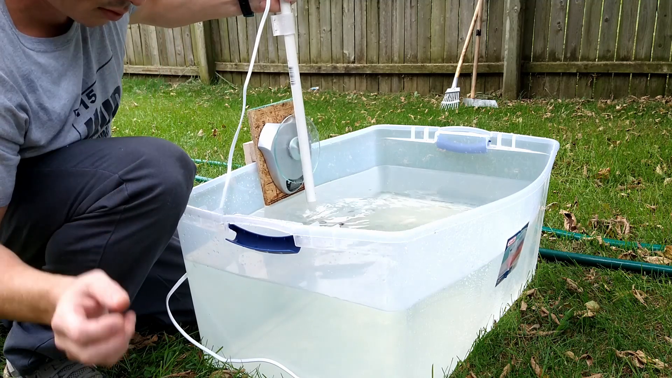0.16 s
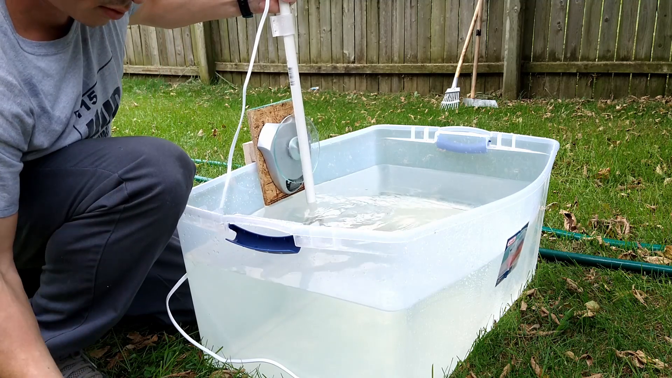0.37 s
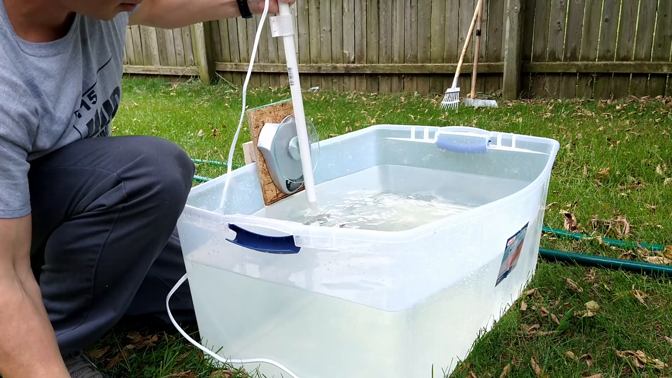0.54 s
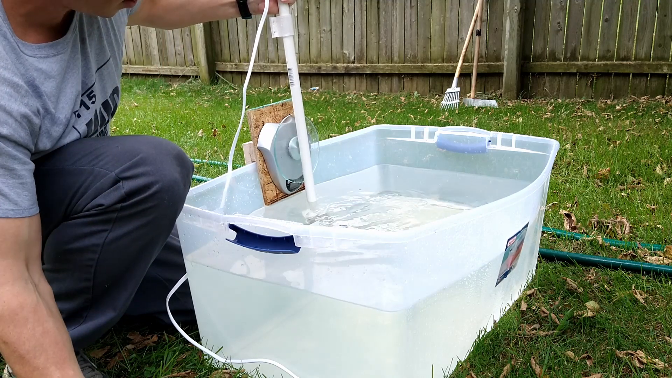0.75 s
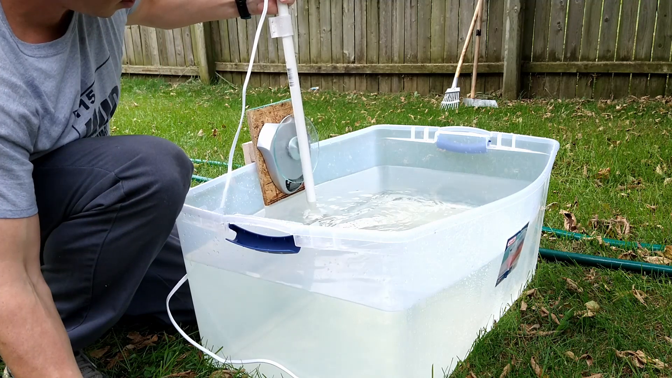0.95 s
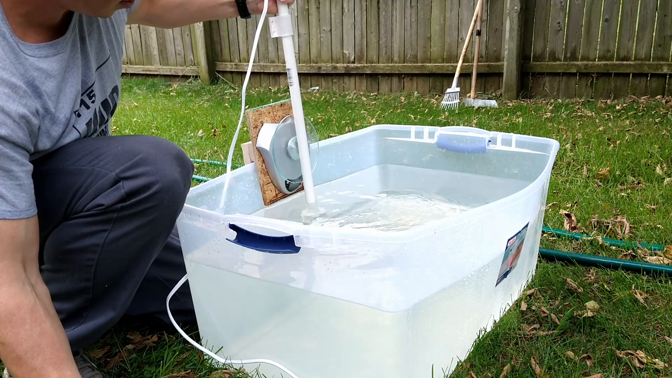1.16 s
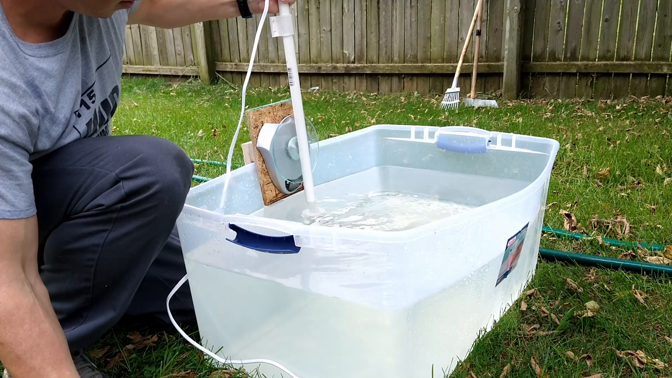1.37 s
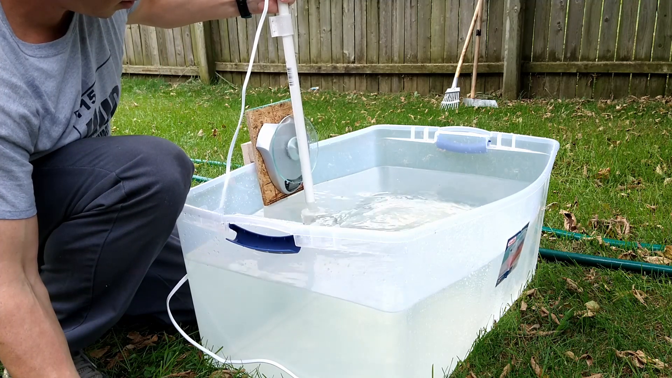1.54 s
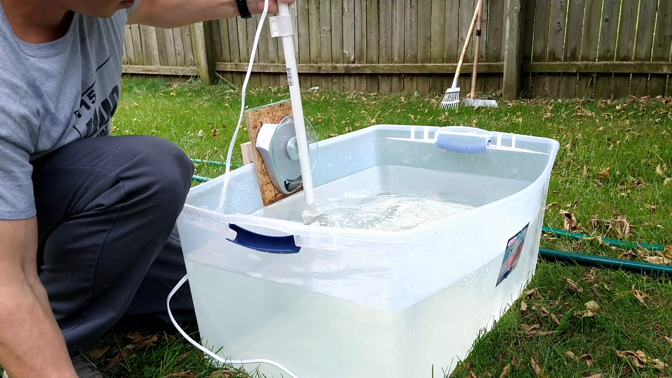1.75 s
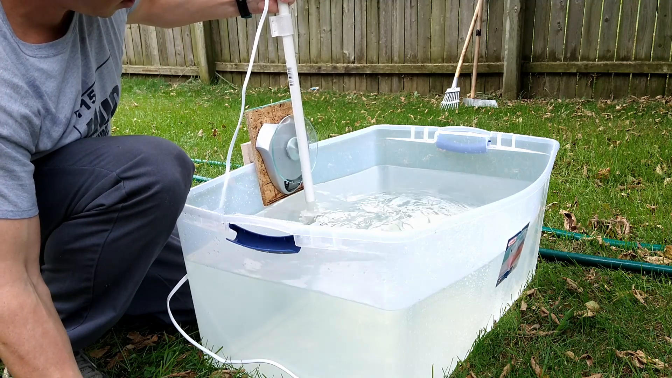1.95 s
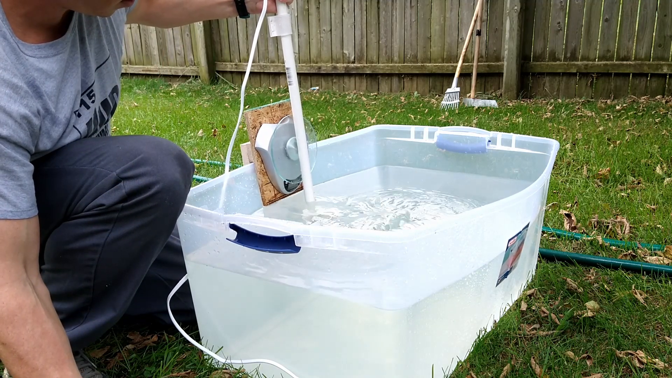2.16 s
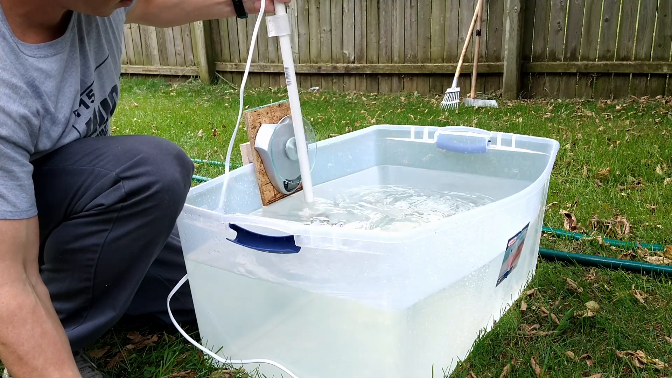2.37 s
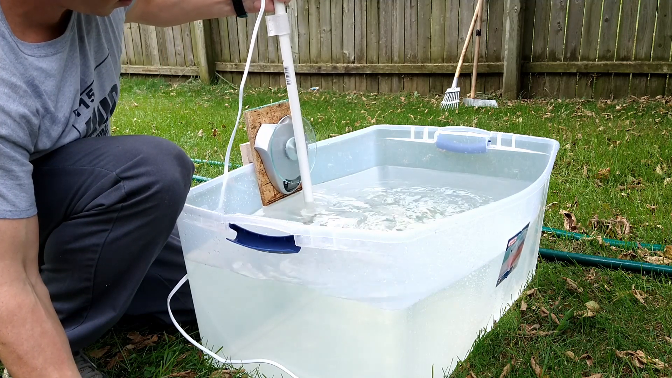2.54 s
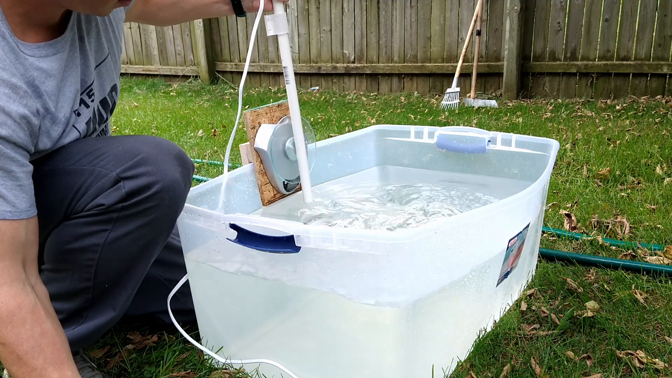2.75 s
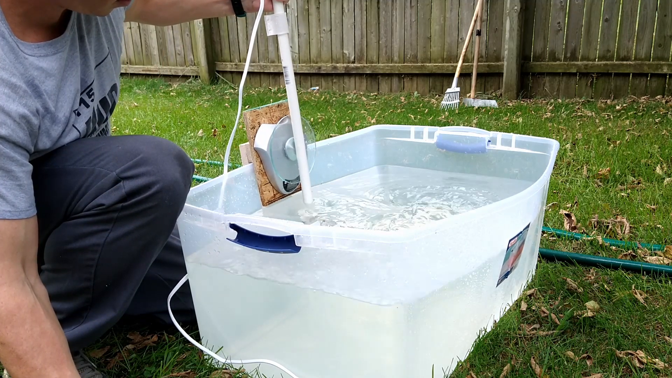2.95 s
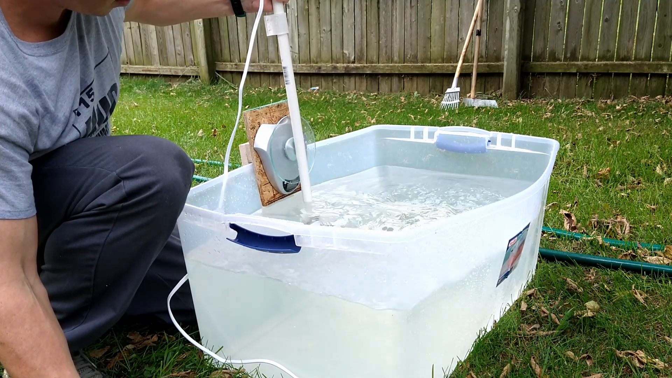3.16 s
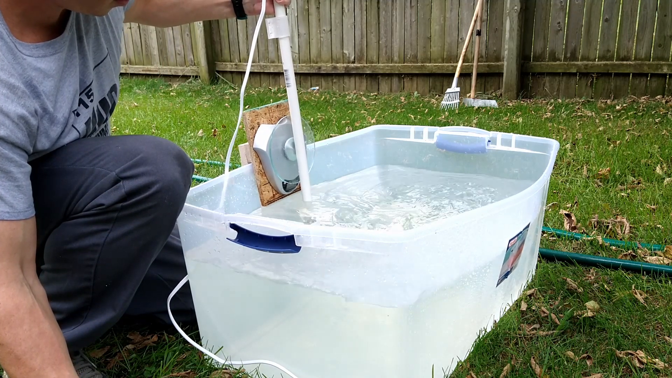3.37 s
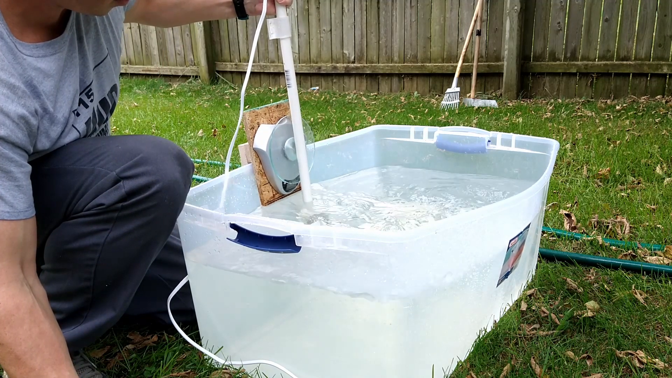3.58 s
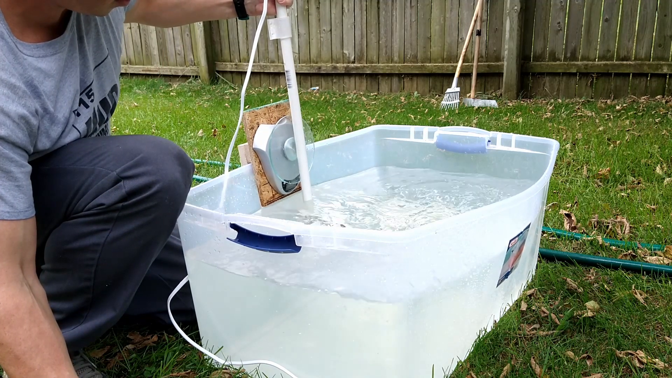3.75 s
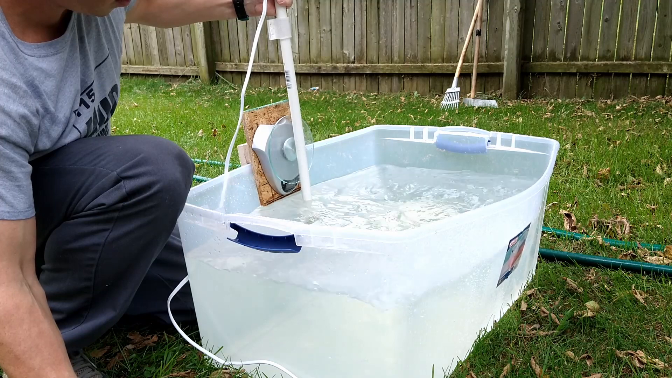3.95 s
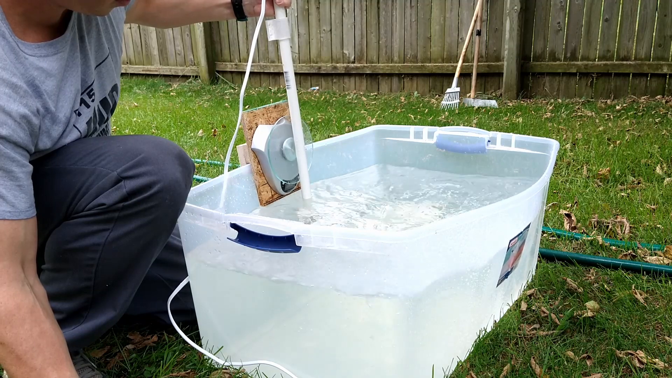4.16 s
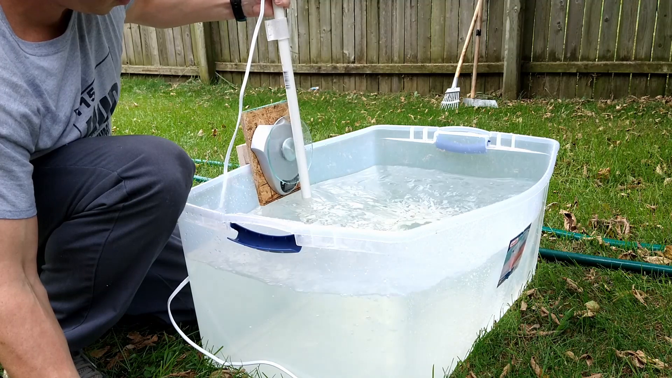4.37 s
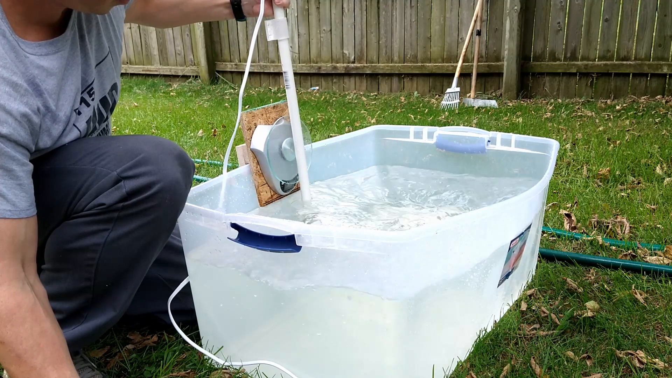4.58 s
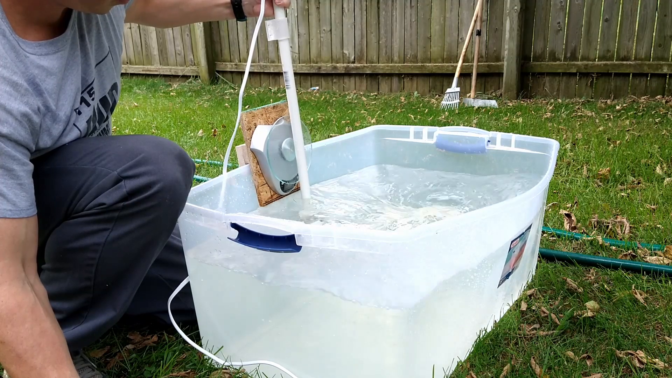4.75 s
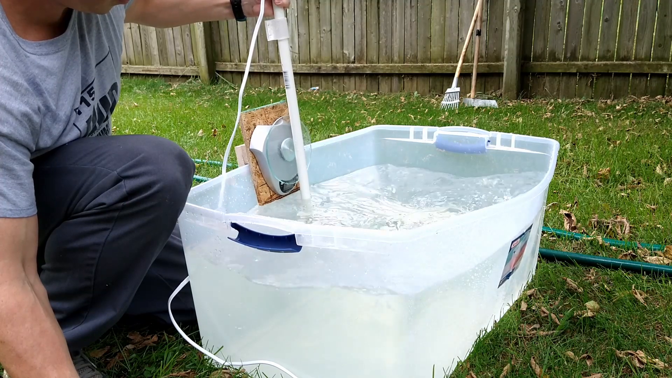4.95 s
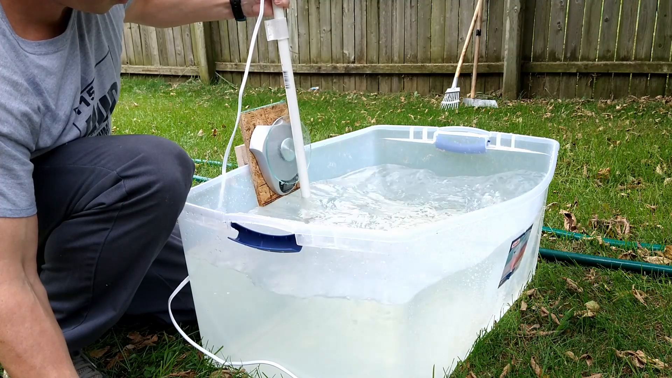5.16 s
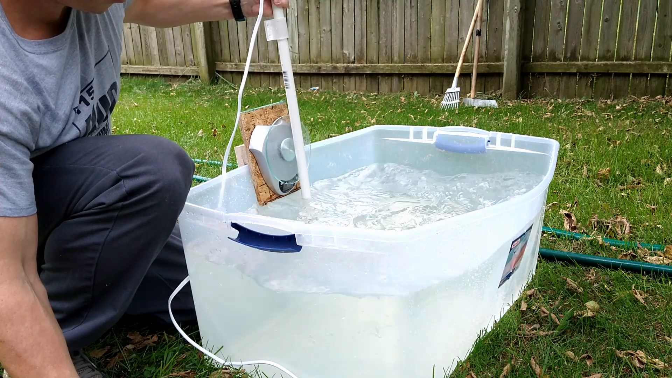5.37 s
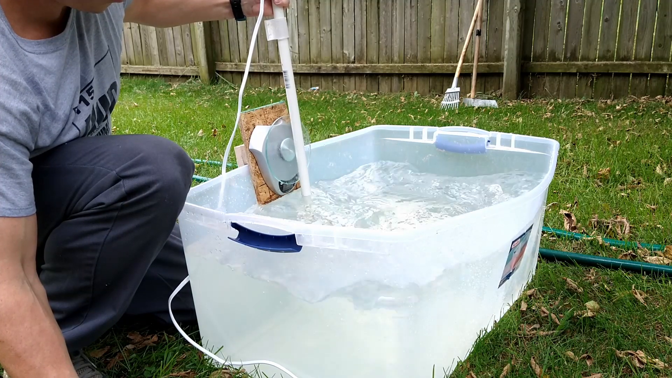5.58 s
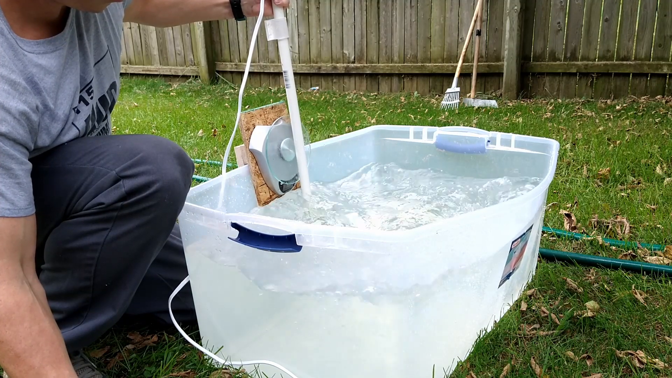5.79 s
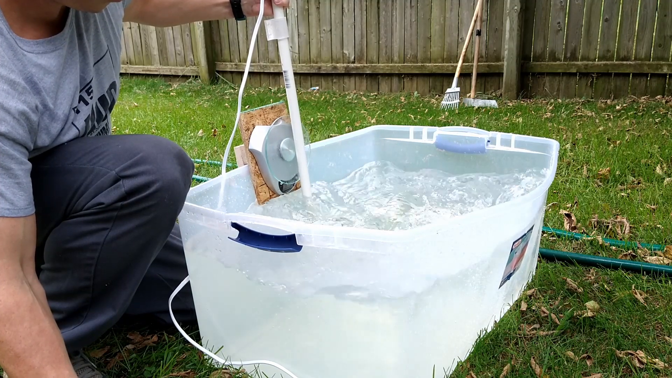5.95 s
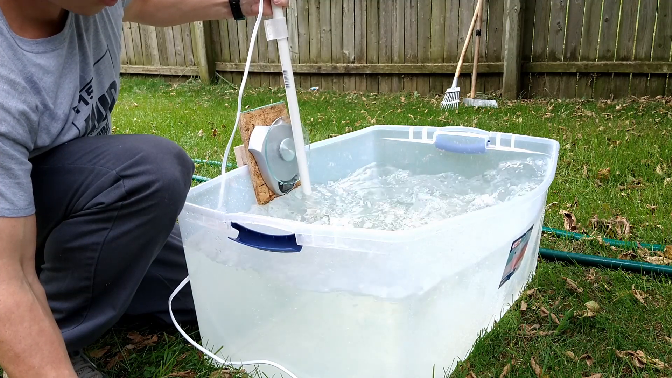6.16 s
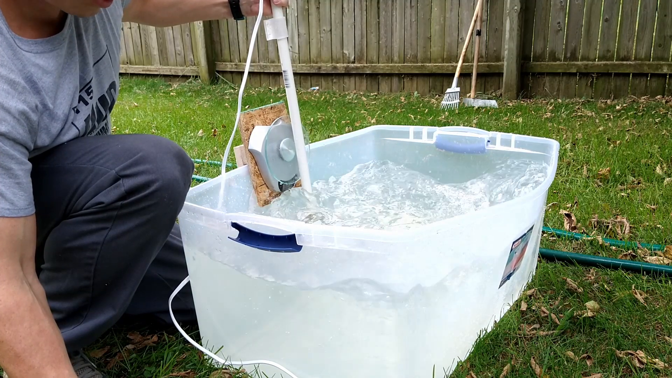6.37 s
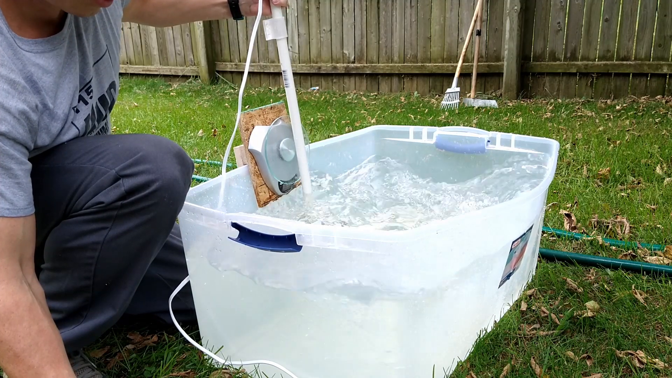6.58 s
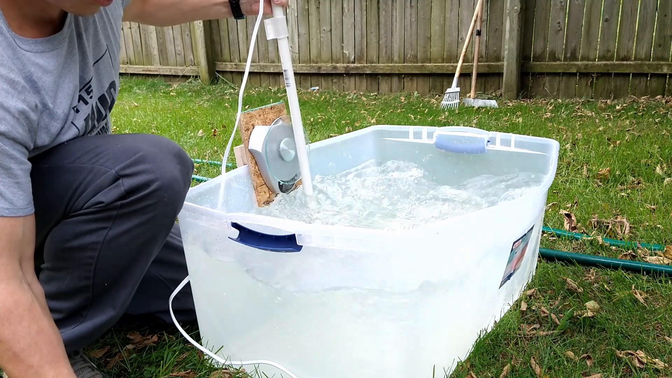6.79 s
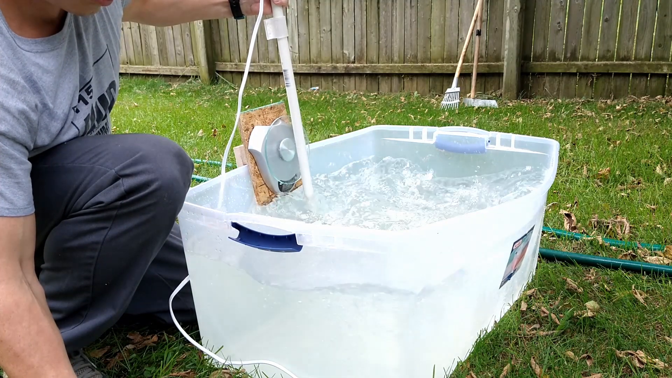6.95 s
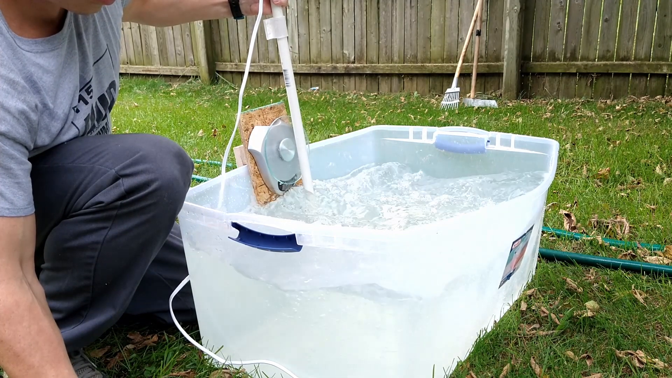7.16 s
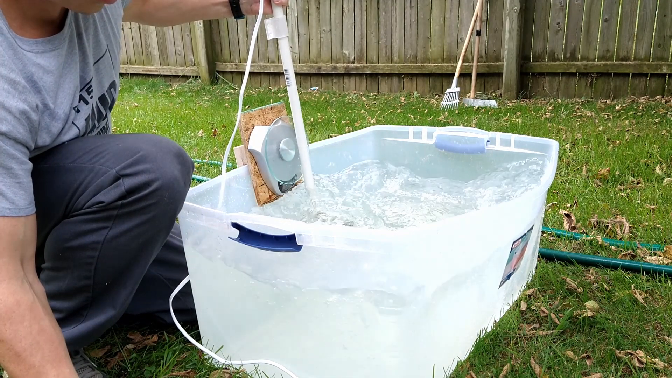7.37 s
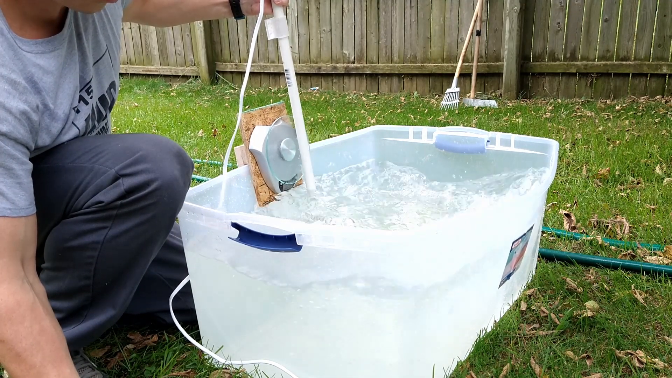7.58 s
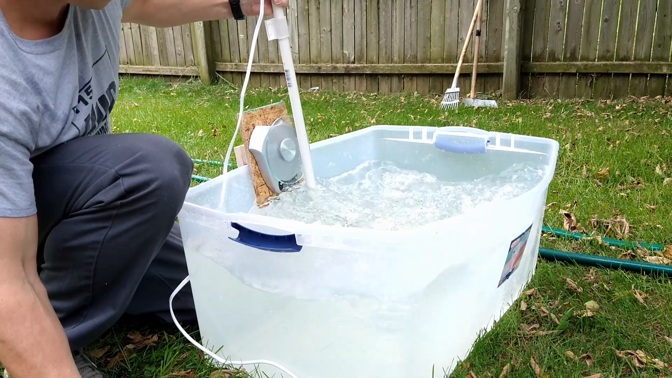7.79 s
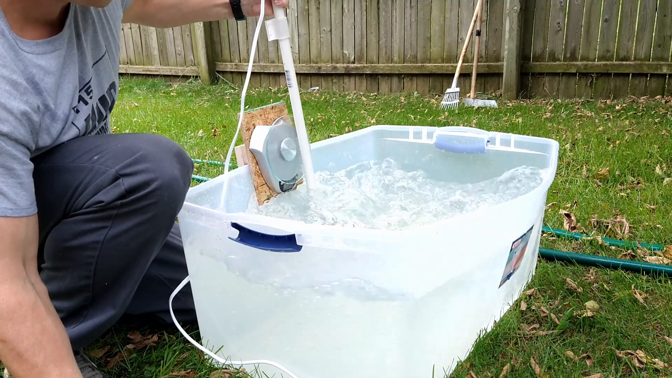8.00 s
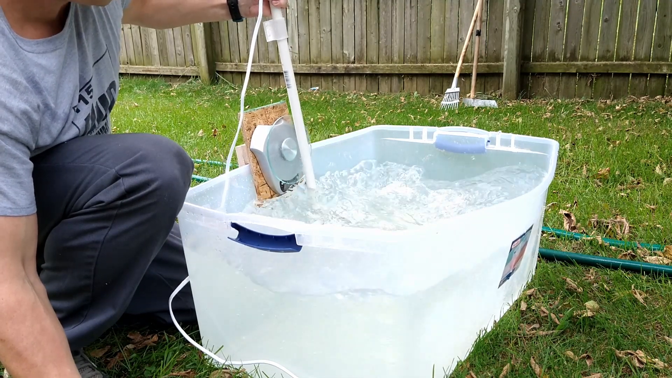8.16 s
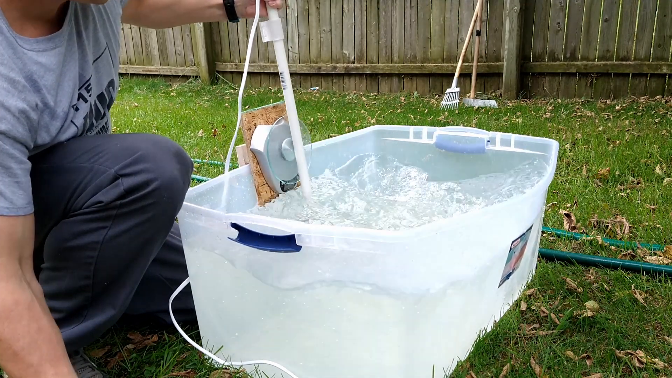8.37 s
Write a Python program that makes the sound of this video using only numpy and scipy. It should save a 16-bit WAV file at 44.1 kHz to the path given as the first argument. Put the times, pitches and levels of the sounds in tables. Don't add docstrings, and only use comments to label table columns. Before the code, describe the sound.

A small electric motor whines up in rising steps outdoors, its propeller churning a plastic tub of water into frothy, bubbling splashes, then easing down.

```python
import sys
import numpy as np
from scipy import signal
from scipy.fft import rfft, irfft, next_fast_len
from scipy.io import wavfile
from scipy.ndimage import uniform_filter1d, map_coordinates

SR = 44100
rng = np.random.default_rng(int(sys.argv[2]) if len(sys.argv) > 2 else 0)


def dump(signal):
    limited = np.clip(np.atleast_2d(signal).T, -1, 1)
    pcm = np.round(limited * 32767).astype(np.int16)
    wavfile.write(sys.argv[1], SR, pcm)


def voltage_ratio(level):
    return 10 ** (np.asarray(level, float) / 20)


N = 371674


def unit(x):
    return x / np.sqrt(np.mean(np.abs(x) ** 2) + 1e-20)


def along(points, hz):
    f, value = np.transpose(points)
    return np.interp(np.log(hz + 1), np.log(f + 1), value)


def curves(rows):
    s, *columns = np.transpose(rows)
    return [uniform_filter1d(np.interp(np.arange(N) / SR, s, c), size=2001) for c in columns]


def bumps(rows):
    t = np.arange(N) / SR
    return sum(height * np.exp(-((t - s) / half) ** 2) for s, height, half in rows)


def wobble(rate):
    coarse = np.arange(0, N + 32, 32)
    knots = rng.standard_normal(int(N * rate / SR) + 5)
    return np.interp(np.arange(N), coarse, map_coordinates(knots, [coarse * rate / SR]))


def blur(width):
    return wobble(width) + 1j * wobble(width)


def filtered(x, response):
    m = next_fast_len(N + 8192)
    return irfft(rfft(x, m) * response(np.fft.rfftfreq(m, 1 / SR)), m)[..., :N]


def modes(table, f):
    return np.sqrt(sum(voltage_ratio(db) ** 2 / (1 + (2 * (f - hz) / width) ** 2) ** 1.35 for hz, width, db in table))


def late(x, s):
    return np.pad(x, (round(s * SR), 0))[:N]


def patchy(depth_db):
    z = signal.stft(rng.standard_normal((2, N)), nperseg=512)[2]
    field = uniform_filter1d(rng.standard_normal(z.shape[1:]), size=6, axis=0)
    field = uniform_filter1d(field, size=10, axis=1)
    return signal.istft(z * voltage_ratio(depth_db * unit(field)), nperseg=512)[1][:, :N]


# frequency in Hz, left-right likeness from 0 to 1.
TUB_ALIKE = [(100, 0.66), (700, 0.87), (1500, 0.52), (2800, 0.88), (5000, 0.62), (8000, 0.82),
             (12000, 0.61)]


def spread(pair, alike=TUB_ALIKE):
    def shares(hz):
        turn = np.arccos(np.clip(along(alike, hz), -1, 1)) / 2
        return np.array([np.cos(turn), np.sin(turn)])
    mid, side = filtered(pair, shares)
    return np.array([mid + side, mid - side])


FULL_HZ = 3186


def law(hz, full_db, slope_db, knee_hz, steep_db, least_db):
    below = np.minimum(np.log2(hz / knee_hz), 0)
    above = np.log2(hz / FULL_HZ) - below
    return np.maximum(full_db + slope_db * above + steep_db * below, least_db)


# time in seconds, gear teeth meeting per second in Hz.
KNOB = [(1.0, 880), (1.6, 1325), (1.83, 1585), (2.22, 1607), (3.4, 2098), (3.74, 2120), (4.04, 2385),
        (4.32, 2405), (4.6, 2515), (4.78, 2655), (5.36, 2990), (5.9, 3184), (6.8, 3181), (7.12, 3196),
        (7.52, 3048), (7.74, 2880), (8.2, 2318), (8.43, 2312)]


def tooth_phase():
    inertia_s = .12
    hz = uniform_filter1d(curves(KNOB)[0], size=round(inertia_s * SR))
    return hz, 2 * np.pi * np.cumsum(hz + .8 * wobble(25)) / SR


# tooth rate in Hz, left level in dB, right level in dB, left lead in radians.
RADIATES = [(980, -79, -80, .8), (1590, -60.5, -61, 1.3), (1850, -62, -61, 2.1), (2130, -41, -49.5, 1.1),
            (2648, -32.5, -33, 1.9), (2800, -24.5, -25.5, 1.095), (3012, -22, -23.5, 1.6),
            (3190, -24, -28, 2.11)]
# time in seconds, left change in dB, right change in dB, extra left
SWAY = [(1.8, -2.2, -1.4, -0.2), (3.1, 0.1, -0.5, -0.4), (3.45, -1.5, -0.9, 0.2), (3.75, -3.5, -2.9, -0.8),
        (4.1, -4.1, -0.3, -0.3), (4.5, -1.9, -2.2, -0.2), (4.95, -0.6, -3.1, -0.4), (5.4, -0.1, 1.3, 0.2),
        (5.82, -2.8, 0.6, -0.1), (5.88, -3.1, -1.5, 0.7), (6.15, -2.3, 0.0, 0.5), (6.37, 0.8, -0.2, -0.3),
        (6.95, -1.5, 0.9, 0.6), (7.08, 0.6, 0.4, -0.3), (7.4, -1.5, -1.3, -0.0), (7.85, -1.2, -0.3, 0.3),
        (8.0, -2.5, -1.9, -0.3), (8.4, 2.0, -0.6, -0.4)]
# tooth rate in Hz, width in Hz, right change in dB, extra left
RIM_SHADE = (2063, 94, -5, 0.5)
# time in seconds, left change in dB, right change in dB,
# extra left lead in radians.
REFLECTIONS = [(1.497, -22.0, -18.0, 0.0), (3.223, -8.0, -12.0, -0.0), (3.427, -7.0, -9.0, 0.0),
               (3.602, 3.0, -19.0, 0.0), (3.657, 3.0, -17.0, 0.0), (3.741, -4.0, 8.0, -1.5),
               (3.861, -6.0, 7.0, 0.5), (3.966, 4.0, -2.0, 0.3), (4.061, 5.0, 1.0, -0.5),
               (4.121, -2.0, -6.0, -0.2), (4.42, 2.0, -5.0, -1.1), (4.455, -4.0, 3.0, -2.1),
               (4.485, -4.0, 7.0, 1.5), (4.515, 4.0, -5.0, 0.8), (4.545, -5.0, 1.0, -1.2),
               (4.629, 5.0, -5.0, 0.6), (4.664, 1.0, -4.0, -0.6), (4.739, 2.0, -2.0, -1.7),
               (4.769, -3.0, 2.0, -1.0), (4.834, 0.0, -4.0, -1.6), (4.864, -8.0, 5.0, 0.2),
               (4.894, -1.0, -6.0, 0.8), (4.954, -3.0, -2.0, 0.9), (5.039, 1.0, 1.0, 0.7),
               (5.183, 1.0, 3.0, -0.0), (5.363, -5.0, -5.0, -0.5), (5.507, 0.0, -4.0, -0.8),
               (5.662, -15.0, 0.0, 0.2), (5.697, 0.0, 3.0, 0.8), (5.827, 2.0, 1.0, -0.7),
               (5.857, -8.0, -1.0, -0.3), (6.136, -5.0, 1.0, -0.1), (7.054, 3.0, 3.0, -0.1),
               (7.179, 1.0, 1.0, 0.9), (7.209, -11.0, -3.0, 0.5), (7.239, -4.0, -2.0, -1.2),
               (7.273, 1.0, -2.0, -1.0), (7.383, -5.0, 3.0, 0.6), (7.413, -7.0, 0.0, -1.2),
               (7.443, 3.0, -1.0, -0.5), (7.558, 0.0, -9.0, -0.4), (7.658, 3.0, 1.0, 0.5),
               (7.707, -1.0, 3.0, 0.5), (7.842, 2.0, -2.0, -0.5), (7.897, -7.0, -2.0, -0.5),
               (7.957, 0.0, -11.0, -0.3), (8.067, 1.0, -8.0, -0.1), (8.146, -6.0, 3.0, -0.3),
               (8.231, 0.0, 5.0, 0.2), (8.386, 0.0, -7.0, -0.3)]
# time in seconds, change in dB, half width in seconds.
DROPOUTS = [(1.57, -8, .025), (2.62, -8, .015), (2.664, -12, .02), (2.71, -5, .02), (3.41, -4, .025),
            (2.873, -9, .02), (3.04, -6, .02), (3.12, -10, .02), (3.3, -7, .04), (4.49, -8, .008),
            (4.65, -8, .008), (6.8, -2, .012), (7.195, -2, .008), (7.37, -3, .008), (7.63, -6, .006),
            (7.705, -5, .006), (7.885, -7, .006), (7.92, -7, .006), (8.045, -8, .006), (8.085, -10, .007),
            (8.11, -6, .006), (8.146, -6, .006)]
# time in seconds, change in dB, half width in seconds.
LEFT_ONLY = [
    (2.32, 6, .08),
    (2.8, 4, .05),
    (3.3, 4, .04),
    (3.52, 2.5, .08),
    (3.702, -9, .01),
    (4.005, -6, .012),
    (4.47, -9, .007),
    (4.94, -9, .008),
    (5.225, -4, .015),
    (5.46, 3, .04),
]
# time in seconds, extra left lead in radians, half width in seconds.
PHASE_SLIPS = [(5.87, .4, .015), (5.945, .6, .015), (6.05, .1, .03), (6.27, -.5, .04), (6.72, -.4, .04),
               (6.8, .4, .025), (6.935, .6, .015), (6.97, -.4, .02), (7.37, .55, .018), (7.2, .25, .012),
               (7.54, -1.2, .03)]


def whine(hz, phase):
    left_db, right_db, lead = (along([(row[0], row[k]) for row in RADIATES], hz) for k in range(1, 4))
    sway_left, sway_right, sway_lead = curves(SWAY)
    shade_hz, shade_width, shade_db, shade_lead = RIM_SHADE
    shade = np.exp(-((hz - shade_hz) / shade_width) ** 2)
    left_db = left_db + sway_left
    right_db = right_db + sway_right + shade_db * shade
    lead = lead + sway_lead + shade_lead * shade

    glide = np.clip(np.abs(np.gradient(hz)) * SR / 400, 0, 1)
    flutter = (.7 + .6 * glide) * np.array([wobble(45), wobble(45)])
    flutter = flutter + bumps(DROPOUTS)
    flutter[0] += bumps(LEFT_ONLY)
    left_echo, right_echo, slip = (bumps([(row[0], row[k], .018) for row in REFLECTIONS]) for k in range(1, 4))
    lead = lead + bumps(PHASE_SLIPS) + slip + (.12 + .1 * glide) * wobble(35)

    level_db = np.array([left_db + left_echo, right_db + right_echo]) + flutter
    start = np.clip((hz - 1040) / 50, 0, 1)
    return np.sqrt(2) * start * voltage_ratio(level_db) * np.sin(phase + np.array([lead, -lead]) / 2)


# frequency in Hz, width in Hz, level in dB idling, slow and fast.
HOUSING = [(2868, 310, -5, -1, 3), (3520, 200, -2, -10, -1), (4610, 110, -2, 4, -17),
           (4920, 150, -11, 1.5, -8), (5070, 210, -13, -15, -10), (5795, 250, -0.5, -1, -2.5),
           (6450, 380, -13, 4.5, 0.5), (6884, 300, 0.5, 11.5, -3), (7380, 160, -13, -15, -11),
           (7730, 169, -23, -18, -7), (8470, 1700, -47, -9, -13.5)]
# frequency in Hz, level in dB per Hz.
BRUSH = [(600, -117), (1500, -13), (2500, -29), (4000, -7.5), (5500, -8), (7200, -51), (8200, -26),
         (9200, -58)]
# frequency in Hz, level in dB per Hz.
SHEEN = [(4410, -10), (7500, 2.5), (8140, -3.5), (10100, 0), (11500, -4), (15100, -3), (16000, -5.5)]
# level at full speed in dB, dB per
# octave, knee in Hz, dB per octave below the knee, least level in dB.
HISS_LAW = (-35.5, 15, 1573, 28.5, -81)
SHEEN_LAW = (-42.5, 9, 1921, 30.5, -100)
ORDERS = [.0685, .9, 1.1, 1.385, 2.049, 2.071, 2.077, 2.77]
ORDERS_DB = [-25, -13, -8, -8, -11, -8, -7, -19]


def motor(hz, phase):
    hiss_db = law(hz, *HISS_LAW)
    top_db = law(hz, *SHEEN_LAW) - hiss_db
    grit = voltage_ratio(np.cos(0.14 * phase) + 0.21 * wobble(11) + 0.64 * wobble(60))
    scrape = grit * patchy(depth_db=0.88)

    def shell(k):
        table = [(m[0], m[1], m[k]) for m in HOUSING]
        return unit(filtered(scrape, lambda f: voltage_ratio(along(BRUSH, f)) + modes(table, f)))

    speed = hz / hz.max()
    fast = np.clip((speed - .5) / 0.5, 0, 1)
    idle = np.clip((.5 - speed) / .08, 0, 1)
    hiss = idle * shell(k=2) + (1 - idle - fast) * shell(k=3) + fast * shell(k=4)
    hiss = hiss + voltage_ratio(top_db) * unit(filtered(scrape, lambda f: voltage_ratio(along(SHEEN, f))))

    lines = sum(voltage_ratio(db - 6 + 3 * wobble(9)) * np.sin(k * phase + .2 * k * wobble(20))
                for k, db in zip(ORDERS, ORDERS_DB))
    cluster = voltage_ratio(-16) * np.real(blur(350) * np.exp(2.075j * phase))
    start_db = bumps([(1.162, 3, 0.2)])
    return voltage_ratio(hiss_db + 2.5 + start_db) * (spread(hiss) + speed ** 3 * (lines + cluster))


# multiple of the tooth rate, level in dB, blur in Hz.
SHAFT_TONES = [
    (.205, 3, 50),
    (.272, -1, 85),
    (.342, -3, 85),
    (.685, -8, 140),
]
# frequency in Hz, width in Hz, level in dB.
TUB = [(525, 53, -0.5), (657, 83, 6.5), (726, 68, 4), (794, 70, 7), (870, 83, -12), (1100, 55, 10)]
# level at full speed in dB,
# dB per octave, knee in Hz, dB per octave below the knee, least level in dB.
DRONE_LAW = (-47, 20, 1960, 61, -67)
# multiple of the tooth rate, tooth rate where
# loudest in Hz, range in Hz, level in dB, blur in Hz.
SINGS = [
    (.272, 1860, 150, -67, 55),
    (.099, 2070, 77, -67, 20),
]


def drone(hz, phase):
    pair = [sum(voltage_ratio(db) * np.real(blur(width) * np.exp(1j * k * phase)) for k, db, width in SHAFT_TONES)
            for _ in "LR"]
    loaded = np.clip((hz - 1100) / 600, 0, 1)
    foam = np.clip(hz / FULL_HZ, 0, 1) ** 6
    loaded = loaded * voltage_ratio(foam * (-8 + 2.5 * wobble(22)))
    shaft = voltage_ratio(-5 - 13 * foam) * np.real(blur(14) * np.exp(.0685j * phase))

    churn_db = 6 + np.clip(hz / 400 - 2, .5, 3.5) * wobble(11)
    churn = filtered(voltage_ratio(churn_db) * patchy(depth_db=3.5), lambda f: modes(TUB, f))
    sing = 0
    for k, loudest_hz, span_hz, db, width in SINGS:
        crossing = np.exp(-((hz - loudest_hz) / span_hz) ** 2)
        sing = sing + voltage_ratio(db) * crossing * np.real(blur(width) * np.exp(1j * k * phase))
    wall = filtered(loaded * np.array(pair), lambda f: modes(TUB, f) + voltage_ratio(-42.0))
    return voltage_ratio(law(hz, *DRONE_LAW) - 4) * (spread(wall + churn) + shaft) + sing


# level at full speed in dB, dB per octave, knee in Hz,
# dB per octave below the knee, least level in dB.
FROTH_LAW = (-44.5, 14, 1821, 158, -97)
# time in seconds, extra froth in dB.
SLOSH = [
    (3.2, -0.5),
    (3.6, -2.5),
    (4.5, 2),
    (5.6, 2),
    (5.93, -2),
    (6.36, 3),
    (6.8, -1),
    (7.45, 1),
    (7.85, 1.5),
    (8.4, 0),
]


def froth_level(hz):
    water_lag_s = .4
    keep = np.exp(-1 / (water_lag_s * SR))
    stirred = hz[0] + signal.lfilter([1 - keep], [1, -keep], hz - hz[0])
    return law(stirred, *FROTH_LAW) + bumps([(s, db, 0.092) for s, db in SLOSH])


# frequency in Hz, level in dB per Hz.
FROTH = [(60, -56), (130, -41), (220, -17.5), (350, -11), (700, -0.5), (980, 0), (1300, 0.5), (2000, -0.5),
         (3200, 1.5), (3900, -14.5), (6000, -3), (12000, -16.5)]


def froth(froth_db):
    lumps = voltage_ratio(0.5 * wobble(5.16) + 0.55 * wobble(22))
    foam = filtered(patchy(depth_db=1.5), lambda f: voltage_ratio(along(FROTH, f)))
    return voltage_ratio(froth_db + 7.5) * unit(lumps * foam)


def plinks(rows, rise):
    s, db, hz, cycles = np.transpose(rows)[..., None]
    t = np.arange(1400) / SR
    age = t * hz / cycles
    envelope = voltage_ratio(db - 39.3 * age) * (1 - np.exp(-t * hz / 2.2))
    wave = envelope * np.sin(2 * np.pi * hz * t * (1 + rise * age))
    at = (np.round(s * SR) + np.arange(1400)).astype(int)
    return np.bincount(at.ravel(), wave.ravel(), N + 1400)[:N]


def bubble_crowd(froth_db):
    surge_db = froth_db + 4.4 * wobble(13.0)
    sides = []
    for _ in "LR":
        when, loud, size = rng.random((3, 1500))
        s = when * (N - 1) / SR
        db = surge_db[(s * SR).astype(int)] - .5 - 3.8 * np.log(1.02 - loud)
        pitch = 560 * 4.12 ** size ** 1.64
        sides.append(plinks(np.array([s, db, pitch, np.full(1500, 12.)]).T, rise=0.034))
    return np.array(sides)


# time in seconds, peak level in dB, pitch in Hz, life in cycles.
BUBBLES = [(2.928, -35.5, 804, 18), (3.196, -25, 690, 7.8), (5.493, -33, 657, 7.1), (5.595, -21.5, 700, 17),
           (5.648, -18, 787, 9.2), (6.276, -24, 903, 14), (6.42, -16.5, 770, 7.7), (6.532, -21, 1100, 17),
           (6.649, -17, 770, 9.9), (6.74, -25, 675, 12), (6.804, -23, 840, 18), (6.872, -22, 726, 11),
           (6.958, -23, 990, 9.4), (7.004, -22, 654, 9.9), (7.052, -20, 770, 18), (7.152, -19.5, 814, 7),
           (7.261, -25, 802, 12), (7.297, -31, 670, 7.4), (7.329, -29, 618, 10.7), (7.487, -17.5, 590, 8),
           (7.582, -3.5, 640, 2.5), (7.801, -32, 624, 41), (7.911, -30, 625, 16), (8.0, -23.5, 870, 16),
           (8.16, -29.5, 620, 15), (8.268, -22.5, 760, 12), (8.377, -28, 810, 24)]
# time in seconds, peak level in dB, pitch in Hz, life in cycles.
DROPS = [(3.0595, -17, 1500, 9.1), (3.1267, -31, 1290, 15), (4.412, -20, 1560, 10),
         (4.558, -24.5, 1880, 47), (5.177, -22, 1410, 14), (5.227, -22, 1570, 19),
         (6.3237, -18, 1796, 10.8), (6.3794, -31, 1490, 14), (7.138, -23, 1700, 13.6),
         (7.2606, -22, 1950, 11.7), (7.4842, -21.5, 1560, 19), (7.7177, -20, 1910, 14),
         (7.888, -23, 2055, 19.2), (7.9698, -24, 1462, 14)]
# time in seconds, peak level in dB, pitch in Hz, life in cycles.
TINKS = [
    (2.885, -25, 2780, 21),
    (2.9897, -25, 2660, 12),
    (3.057, -10, 2660, 4.2),
    (3.1762, -22, 2410, 15),
    (3.1931, -22.5, 2520, 22),
    (3.2256, -29, 2550, 21),
    (3.3089, -30, 2760, 18),
    (3.355, -26.5, 2640, 17),
]
# time in seconds, peak level in dB, pitch in Hz, life in cycles.
SLAPS = [
    (3.0568, -13, 3600, 5),
    (3.0572, -15, 2100, 5),
    (2.887, -22, 1300, 3),
    (2.9915, -22, 900, 2.5),
    (3.131, -24, 1500, 3),
    (3.177, -21, 1900, 4),
    (3.129, -21, 2300, 4),
    (3.1935, -22, 1100, 2),
    (2.8895, -26, 3000, 8),
    (2.991, -23, 1800, 4),
]
# time in seconds, peak level in dB, pitch in Hz.
GURGLES = [(3.3, -36, 760), (3.847, -38, 740), (4.495, -35, 680), (4.755, -38, 703), (4.788, -35, 537),
           (4.918, -42, 694), (5.07, -33, 680), (5.186, -41, 589), (5.303, -31, 1100), (5.397, -41, 630),
           (5.45, -45, 795), (5.715, -32, 770), (5.808, -35, 650), (6.004, -32, 1140), (6.03, -33, 845),
           (6.105, -29, 774), (6.137, -31, 902), (6.194, -35, 1110), (6.305, -28, 734), (6.33, -25.5, 1030),
           (6.365, -28, 1120), (6.44, -28, 1010), (6.625, -32, 636), (6.675, -30, 624), (6.765, -23, 965),
           (6.845, -30, 639), (7.08, -31, 860), (7.165, -30, 687), (7.357, -27.5, 794), (7.385, -32, 944),
           (7.52, -30, 950), (7.545, -31.5, 616), (7.62, -31, 990), (7.66, -36, 670), (7.7, -36, 1130),
           (7.755, -35, 760), (7.803, -30, 960), (7.84, -27.5, 804), (7.94, -32, 587), (8.215, -31, 588),
           (8.33, -25, 880), (8.41, -26, 865)]


def single_bubbles():
    rings = plinks(BUBBLES, rise=0.058) + plinks(DROPS, rise=0.03)
    rings += plinks(TINKS, rise=0.021) + plinks(SLAPS, rise=.01)
    return rings + plinks([(*row, 27) for row in GURGLES], rise=.14)


# time in seconds, peak level in dB, start pitch in Hz,
# end pitch in Hz, length in seconds.
GULPS = [(3.191, -43, 450, 760, .018), (5.59, -48, 340, 430, .05), (5.65, -48, 310, 350, .03),
         (6.14, -52, 330, 460, .04), (6.37, -46, 230, 330, .06), (6.375, -47, 450, 420, .04),
         (6.41, -49, 340, 420, .05), (6.565, -44, 270, 320, .04), (6.6, -46, 340, 420, .05),
         (7.06, -48, 300, 370, .08), (7.375, -48, 420, 450, .04), (7.42, -42, 290, 330, .045),
         (7.47, -48, 310, 340, .04), (7.575, -43, 430, 460, .04), (7.58, -53, 290, 340, .04),
         (7.66, -49, 370, 400, .04), (7.905, -50, 300, 340, .03)]


def gulps():
    out = np.zeros(N)
    for at, peak_db, start_hz, end_hz, length in GULPS:
        u = np.arange(round(length * SR)) / (length * SR)
        turns = np.cumsum(start_hz + (end_hz - start_hz) * u) / SR
        rough = unit(np.convolve(rng.standard_normal(len(u)), np.hanning(90), "same"))
        tone = np.sin(2 * np.pi * turns) + 0.59 * rough * np.sin(2.6 * np.pi * turns)
        out[round(at * SR):][:len(u)] += voltage_ratio(peak_db) * np.sin(np.pi * u ** 0.91) * tone
    return out


# time in seconds, peak level in dB.
SNAPS = [(0.7084, -61), (0.7304, -60), (0.7504, -61), (0.7944, -65), (0.91, -62), (2.966, -36),
         (2.8842, -36), (2.9881, -32), (3.0568, -34), (3.1294, -29), (3.1764, -33), (3.2252, -22),
         (3.2798, -27), (3.283, -29), (8.088, -29), (6.5415, -20), (6.768, -23)]


def snaps():
    out = np.zeros(N)
    t = np.arange(300) / SR
    for at, peak_db in SNAPS:
        bright = np.diff(rng.standard_normal(302), n=2)
        burst = unit(np.convolve(bright, np.hanning(8), "same"))
        envelope = voltage_ratio(peak_db - 60 * t / .009) * (1 - np.exp(-t / .0002))
        out[round(at * SR):][:len(t)] += envelope * burst
    return out


# delay in seconds, level in dB.
FENCE = [
    (.0031, -9),
    (.0118, -14),
    (.0207, -15),
    (.0334, -17),
    (.052, -20),
]


def water(hz):
    froth_db = froth_level(hz)
    single = single_bubbles() + gulps() + snaps()
    near = single + sum(voltage_ratio(db - 12.0) * late(single, delay) for delay, db in FENCE)
    churned = froth(froth_db) + bubble_crowd(froth_db)
    return spread(churned) + spread(np.array([near, late(near, .0008)]))


# frequency in Hz, width in Hz, change in dB.
GROUND_BANDS = [(3830, 53, -4.5), (4350, 56, -1), (8260, 200, 1)]
# frequency in Hz, width in Hz, change in dB.
FUNNEL_BANDS = [(584, 28, -5.5), (965, 110, -9)]


def dips(table, f):
    return voltage_ratio(sum(db * np.exp(-((f - hz) / width) ** 2) for hz, width, db in table))


def ground_reflection(x, hz):
    funnel = np.exp(-((hz - 2320) / 330) ** 2)
    x = filtered(x, lambda f: dips(GROUND_BANDS, f))
    return x + funnel * filtered(x, lambda f: dips(FUNNEL_BANDS, f) - 1)


# frequency in Hz, left minus right in dB.
LEFT_RIGHT = [(60, 1), (110, 0), (200, -0.5), (380, 1), (700, 1.5), (1290, -0.5), (2380, 1.5), (4400, 5.5),
              (8120, 4.5), (15000, 2.5)]
# frequency in Hz, left lead in radians.
LEAD = [(0, 0), (950, 0), (1460, .8), (2760, 1.3), (3400, 2.2), (7580, 3), (10900, 5.6), (11500, 4.3),
        (14400, 6.4)]


def ports(x):
    half = np.array([[.5], [-.5]])

    def response(hz):
        lead = np.interp(hz, *np.transpose(LEAD))
        return voltage_ratio(half * along(LEFT_RIGHT, hz)) * np.exp(1j * half * lead)
    return filtered(x, response)


# frequency in Hz, level in dB per Hz.
AIR = [(120, -33), (190, -18), (240, -13.5), (280, -4.5), (330, -10), (700, -9.5), (1500, -16.5),
       (2500, -24.5), (6000, -38), (9000, -41), (14500, -45), (15300, -26), (15800, -36)]
# frequency in Hz, left-right likeness from 0 to 1.
YARD_ALIKE = [(60, 1), (300, 0.77), (640, 0), (3000, 0), (15000, 0)]
# frequency in Hz, level in dB per Hz.
TRAFFIC = [(15, -48), (25, -62), (50, -2), (75, 0.5), (113, 0.5), (167, -7), (200, -5.5), (260, -14.5),
           (440, -120)]
# time in seconds, level in dB.
RUMBLE = [
    (0.0, -66),
    (0.11, -64.5),
    (2.42, -64),
    (4.04, -55.5),
    (8.43, -57),
]
# time in seconds, pitch in Hz, level in dB.
HUM = [
    (0, 110.4, -70),
    (.4, 110, -65),
    (.7, 124.2, -68.5),
    (2, 123.8, -63.5),
    (3.2, 124.1, -72),
]


def yard():
    air = spread(filtered(patchy(depth_db=0.5), lambda f: voltage_ratio(along(AIR, f))), YARD_ALIKE)
    road = spread(filtered(patchy(depth_db=.8), lambda f: voltage_ratio(along(TRAFFIC, f))), YARD_ALIKE)
    hum_hz, hum_db = curves(list(HUM) + [(3.6, 115.6, -75)])
    hum_phase = 2 * np.pi * np.cumsum(hum_hz + 6 * wobble(27)) / SR
    hum = voltage_ratio(hum_db + 1 + 2.5 * wobble(14)) * np.sin(hum_phase)
    line = voltage_ratio(-76 + .8 * wobble(6)) * np.sin(2 * np.pi * 15620 * np.arange(N) / SR)
    return voltage_ratio(-68) * unit(air) + voltage_ratio(curves(RUMBLE)[0]) * unit(road) + hum + line


def scene():
    hz, phase = tooth_phase()
    tub = motor(hz, phase) + drone(hz, phase) + water(hz)
    return whine(hz, phase) + ports(ground_reflection(tub, hz)) + yard()


def band_limit(x):
    return signal.sosfilt(signal.butter(12, 17010, fs=SR, output="sos"), x)


def record(dry):
    mix = filtered(dry, lambda hz: (hz < 15770) * hz ** 4 / (hz ** 4 + 44 ** 4))
    return band_limit(mix)


dry = scene()
out = record(dry)
dump(out)
```